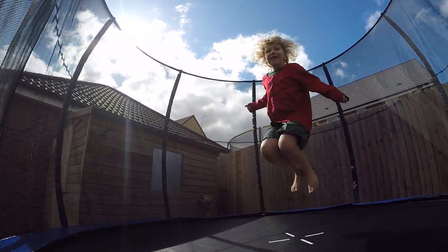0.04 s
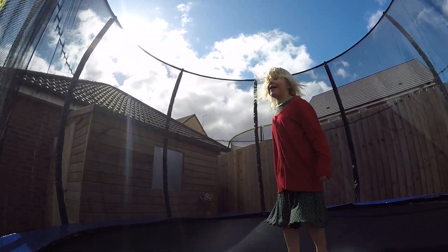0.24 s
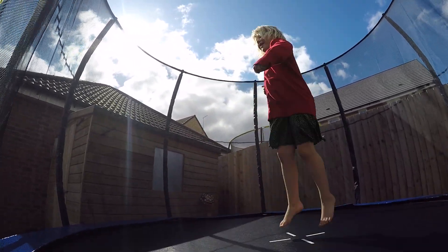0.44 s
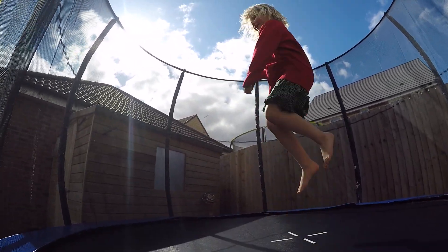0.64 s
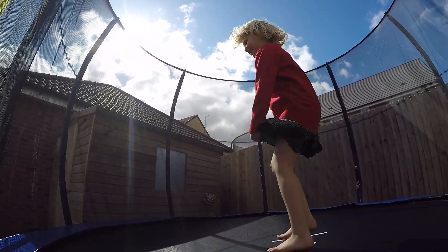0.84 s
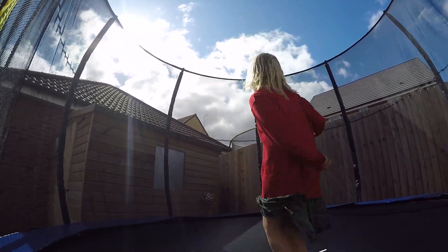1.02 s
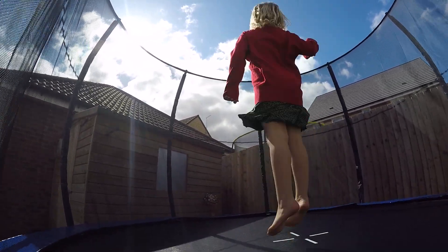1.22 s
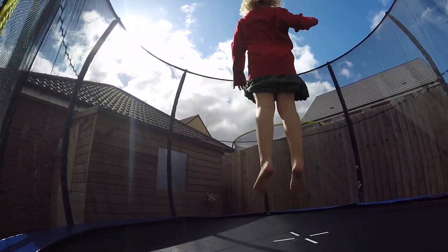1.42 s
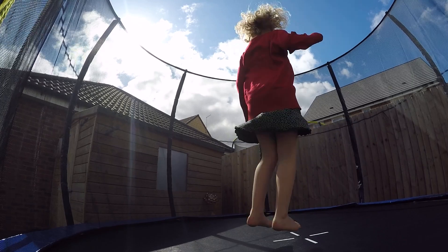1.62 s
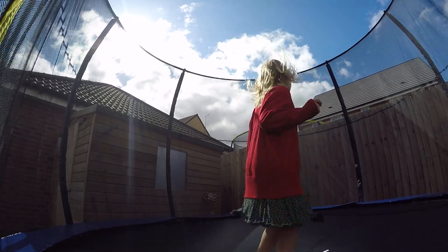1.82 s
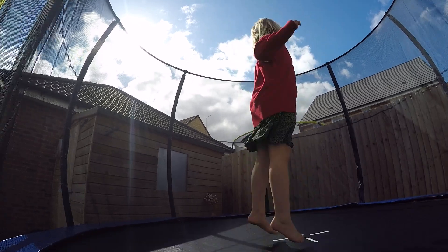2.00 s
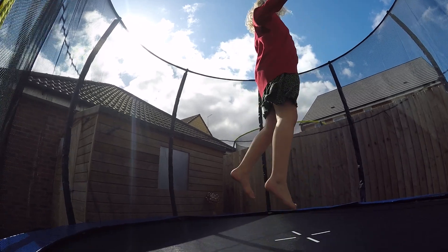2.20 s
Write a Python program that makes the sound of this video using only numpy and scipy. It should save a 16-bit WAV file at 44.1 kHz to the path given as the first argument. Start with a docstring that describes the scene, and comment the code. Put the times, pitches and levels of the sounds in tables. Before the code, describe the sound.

Trampoline bounces: three deep, close thumps with creaking springs and a clanking frame.

```python
"""Three close, deep booms with creaking springs: a child bouncing on a garden trampoline.
Feet slap, the mat drops in pitch as it sinks, and a loose frame joint clanks.
Springs creak by stick-slip and sliding fabric hisses on the way down and up.
The empty mat flaps back after each take-off; frame and springs hum on over a low outdoor wind."""
import sys
import numpy as np
from scipy import signal
from scipy.fft import rfft, irfft
from scipy.io import wavfile

SR = 44100
rng = np.random.default_rng(int(sys.argv[2]) if len(sys.argv) > 2 else 0)


def pcm_store(signal):
    """Save signal as 16-bit PCM."""
    levels = np.round(np.clip(np.atleast_2d(signal), -1, 1) * 32767)
    wavfile.write(sys.argv[1], SR, levels.astype(np.int16).T)


N = 103635
TIME = np.arange(N) / SR

# modes of the taut mat: f/Hz, level/dB, t60/s
MAT_MODES = [(121, 2, 0.087), (183.7, 0.5, 0.1), (217, -9, 0.27), (274, -10.5, 0.14), (306, -38, 0.3)]
# modes of the spring hooks: f/Hz, level/dB, t60/s
HOOK_MODES = [(4060, 0, .1), (4260, 1, .1), (4950, -2, .05), (5300, 0, .06), (6200, -3, .1),
              (6850, -3, .08), (7550, -5, .05), (9000, -7, .06), (10000, -6, .08), (10450, -8, .08)]


def amp(db):
    """Decibels to gain."""
    return 10 ** (np.asarray(db) / 20)


def unit(x):
    """x at rms 1."""
    return x / np.sqrt(np.mean(x ** 2) + 1e-20)


def since(start_s):
    """Seconds since start_s; zero before it."""
    return np.maximum(TIME - start_s, 0)


def colour(x, spectrum):
    """x filtered by (f/Hz, level/dB) points, at rms 1."""
    hz, db = np.transpose(spectrum)
    bin_db = np.interp(np.log(np.fft.rfftfreq(N, 1 / SR) + 1), np.log(hz), db)
    return unit(irfft(rfft(x) * amp(bin_db), N))


def noise(spectrum):
    """Coloured noise at rms 1."""
    return colour(rng.standard_normal(N), spectrum)


def burst(start_s, decay_s, rise_s=0.00026):
    """Envelope: quick attack, exponential fall."""
    t = since(start_s)
    return (1 - np.exp(-t / rise_s)) * np.exp(-t / decay_s)


def swell(t, peak_s):
    """Envelope: rises to 1 at peak_s, then dies away."""
    return t / peak_s * np.exp(1 - t / peak_s)


def ring(modes, t):
    """Decaying modes struck at t = 0."""
    return sum(amp(db - 60 * t / t60_s) * np.sin(2 * np.pi * hz * t) for hz, db, t60_s in modes)


def with_ring(x, modes, ring_db):
    """x plus the modes it excites, at ring_db relative to x."""
    ringing = signal.fftconvolve(x, ring(modes, TIME[:SR // 2]))[:N]
    return x + amp(ring_db) * x.std() * unit(ringing)


def slips(rate_per_s=2200, spread_db=3, click_share=0.55):
    """Dense stick-slip clicks of uneven size in a smooth rub."""
    size = amp(spread_db * np.minimum(rng.exponential(1, N), 4))
    clicks = size * rng.choice([-1, 1], N) * (rng.random(N) < rate_per_s / SR)
    return np.sqrt(click_share) * unit(clicks) + np.sqrt(1 - click_share) * rng.standard_normal(N)


def mat_booms(sunk_hz=13.7, sag_s=0.026):
    """The mat booms, its pitch dropping as it sinks under the child."""
    # t/s, level/dB, starting f/Hz, swell/s
    landings = [(.210, -1.5, 60.7, 0.013), (.970, -6, 61.8, 0.017), (1.769, -8.5, 44.4, .022)]
    out = np.zeros(N)
    for start_s, db, hz, peak_s in landings:
        t = since(start_s)
        cycles = sunk_hz * t + (hz - sunk_hz) * sag_s * (1 - np.exp(-t / sag_s))
        out -= amp(db) * swell(t, peak_s) ** 1.11 * np.sin(2 * np.pi * cycles)
    return out


def mat_flaps(flutter_hz=37.55, ring_db=-22.5):
    """The empty mat flaps back and rings; a flutter builds slowly."""
    # t/s, flap level/dB, flap f/Hz, flutter level/dB
    takeoffs = [(0.517, -20, 23.6, -62), (1.279, -14, 24.7, -32), (2.093, -17, 25.6, -31.5)]
    out = np.zeros(N)
    for start_s, db, hz, flutter_db in takeoffs:
        t = since(start_s)
        out += amp(db) * swell(t, peak_s=0.016) * np.sin(2 * np.pi * hz * t)
        out += amp(db + ring_db) * ring(MAT_MODES, t)
        out += amp(flutter_db) * swell(t, peak_s=0.17) ** 2 * np.sin(2 * np.pi * flutter_hz * t)
    return out


def mat_sway():
    """The loaded mat heaves as the feet push off."""
    # t/s, level/dB, f/Hz, swell/s
    heaves = [(0.354, -26.5, 35, 0.034), (1.074, -23.5, 16, 0.03), (1.17, -25.5, 30.4, 0.032)]
    return sum(amp(db) * swell(since(start_s), peak_s) ** 2 * np.sin(2 * np.pi * hz * since(start_s))
               for start_s, db, hz, peak_s in heaves)


def feet():
    """Feet dent the mat with a short suck of air, smack the weave, ring it and skid."""
    # t/s, dent level/dB, dent width/s, smack level/dB, ring level/dB
    footfalls = [(0.203, -7, 0.0019, -28, -58), (.212, -32, 0.0041, -33, -21.5),
                 (0.948, -14, 0.0079, -40, -26.5), (.959, -32, 0.0028, -41.5, -21.5),
                 (1.763, -29, 0.0036, -46, -35), (1.771, -19, 0.0033, -38.5, -26.5)]
    # sole on weave: f/Hz, level/dB
    smack_spectrum = [(60, -9), (180, -0.5), (300, -7), (420, -1), (700, 6), (1300, -10), (3200, -12),
                      (6000, -31.5), (15000, -33.5)]
    # t/s, level/dB, decay/s
    skids = [(0.227, -47.5, 0.016), (1.001, -51, 0.0089), (1.797, -56, 0.018)]
    # f/Hz, level/dB
    skid_spectrum = [(1000, -38), (3000, -25), (5500, 10), (8000, 1), (12000, 0.5), (15000, -27)]
    out, smack = np.zeros(N), noise(smack_spectrum)
    for start_s, dent_db, width_s, smack_db, ring_db in footfalls:
        t = since(start_s)
        out -= amp(dent_db) * swell(t, width_s) ** 2
        out += amp(smack_db) * burst(start_s, decay_s=0.0087) * smack
        out -= amp(ring_db) * ring(MAT_MODES, t)
    skid_envelope = sum(amp(db) * burst(start_s, decay_s) for start_s, db, decay_s in skids)
    return out + skid_envelope * colour(slips(), skid_spectrum)


def springs_and_fabric(stutter_db=0.87):
    """Springs grind and ring their coils; sliding fabric hisses and stirs the hooks."""
    # stretch or release: peak t/s, rise/s, fall/s, creak level/dB, hiss level/dB
    strokes = [(0.245, 0.067, 0.068, -40, -61), (.355, 0.11, 0.048, -49, -48),
               (.52, 0.4, 0.094, -54.5, -61), (1.004, 0.021, 0.042, -40.5, -56.5),
               (1.137, 0.044, 0.019, -48.5, -47), (1.2, 0.035, 0.078, -53, -54),
               (1.812, 0.018, 0.073, -46.5, -53.5), (1.877, 0.014, 0.023, -44.5, -51),
               (1.928, 0.049, 0.071, -48, -50.5)]
    # f/Hz, level/dB
    creak_spectrum = [(200, -67), (400, 5.5), (650, 2), (1200, 1), (1800, 1.5), (2700, 1), (3700, -2.5),
                      (5500, -10.5), (8000, -25), (15000, -26)]
    # f/Hz, level/dB
    hiss_spectrum = [(500, -16), (2000, 1), (3500, 9.5), (5500, 5.5), (8000, 0.5), (12000, -5),
                     (15000, -8.5)]
    # level modulation from uneven sliding: f/Hz, level/dB
    stutter_spectrum = [(5, 0), (20, 2), (70, -24), (150, -14), (600, -57), (2000, -100)]
    # f/Hz, level/dB, t60/s
    coil_modes = [(1120, -2, .4), (1560, 0, .35), (1668, 0, .35), (1760, -5, .2), (1835, -6, .2),
                  (1999, 0, .35), (2084, -1, .3), (2635, -6, .15), (2865, -5, .3), (3240, -3, .2),
                  (3532, -3, .3)]
    creak_power, hiss_power = np.zeros((2, N))
    for peak_s, rise_s, fall_s, creak_db, hiss_db in strokes:
        speed = np.exp(-np.maximum(peak_s - TIME, 0) / rise_s - since(peak_s) / fall_s)
        creak_power += (amp(creak_db) * speed) ** 2
        hiss_power += (amp(hiss_db) * speed) ** 2
    stutter = amp(stutter_db * noise(stutter_spectrum))
    creak = stutter * np.sqrt(creak_power) * colour(slips(), creak_spectrum)
    hiss = stutter * np.sqrt(hiss_power) * colour(slips(), hiss_spectrum)
    return with_ring(creak, coil_modes, ring_db=-6.5) + with_ring(hiss, HOOK_MODES, ring_db=-10.5)


def spring_groans(width_hz=330, sag_hz_per_s=8100, low_ratio=0.31, low_db=3):
    """Slips excite two spring resonances that sag at full stretch."""
    # t/s, level/dB, swell/s, starting f/Hz
    groans = [(.232, -40, 0.018, 2120), (0.995, -42.5, 0.012, 1920), (1.819, -50, 0.014, 1770)]
    out = np.zeros(N)
    pole = np.exp(-np.pi * width_hz / SR)
    for start_s, db, peak_s, hz in groans:
        t = since(start_s)
        cycles = np.cumsum(np.maximum(hz - sag_hz_per_s * t, hz / 2)) / SR
        for ratio, gain in [(1, 1), (low_ratio, amp(low_db))]:
            # gliding band-pass: shift down, low-pass, shift back
            carrier = np.exp(2j * np.pi * ratio * cycles)
            baseband = signal.lfilter([1], [1, -2 * pole, pole * pole], slips() / carrier)
            out += gain * amp(db) * swell(t, peak_s) ** 2 * unit((carrier * baseband).real)
    return out


def frame_joint(rise_s=0.0015, chatter_db=-8, chatter_decay_s=0.022):
    """A loose steel joint knocks, rings briefly and chatters."""
    # t/s, level/dB
    clanks = [(.257, -30), (.370, -39.5), (1.219, -32.5), (2.001, -33.5)]
    # f/Hz, level/dB, t60/s
    joint_modes = [(555, -7, .13), (600, -11, .1), (680, -11, .09), (1001, -18, .07), (1895, -15, .09),
                   (2229, -2, .13), (2290, -8, .07), (2616, -14, .07), (3338, -17, .07), (3639, -15, .06),
                   (3930, -14, .07), (4188, -19, .06)]
    # f/Hz, level/dB
    chatter_spectrum = [(200, -14), (420, 1), (600, 9), (1200, -5), (2300, 3.5), (3000, -5.5), (3800, -0.5),
                        (5000, -15), (15000, -37)]
    out, chatter = np.zeros(N), amp(chatter_db) * noise(chatter_spectrum)
    for start_s, db in clanks:
        t = since(start_s)
        tone = (1 - np.exp(-t / rise_s)) * ring(joint_modes, t)
        out += amp(db) * (tone + chatter * burst(start_s, chatter_decay_s, rise_s))
    return out


def net_and_cloth():
    """Net and cloth tick and brush together, jingling the hooks."""
    # t/s, level/dB, decay/s
    ticks = [(.2005, -37, 0.0026), (0.8383, -40, 0.0046), (.862, -43, 0.0051), (0.9487, -39, .0009),
             (1.0765, -40, 0.00071), (1.239, -41, .002), (1.762, -47, .0015), (1.797, -42, .004)]
    # f/Hz, level/dB
    tick_spectrum = [(400, -14), (1000, 4), (1800, 10.5), (3500, 3), (5200, 2), (7600, -11), (10000, -21),
                     (15000, -24)]
    # t/s, level/dB, decay/s
    brushes = [(0.56, -48.5, 0.024), (.843, -55, 0.065), (1.145, -41.5, 0.01), (1.183, -47, 0.012),
               (1.336, -50.5, 0.031), (1.393, -53, 0.03)]
    # f/Hz, level/dB
    brush_spectrum = [(600, -14), (1800, 6.5), (3300, 8), (4200, -3.5), (5100, 9), (6200, -6), (7500, -1.5),
                      (8800, -8.5), (10000, -11), (15000, -22)]
    tick_envelope = sum(amp(db) * burst(start_s, decay_s) for start_s, db, decay_s in ticks)
    brush_envelope = sum(amp(db) * burst(start_s, decay_s, rise_s=0.0012)
                         for start_s, db, decay_s in brushes)
    rustle = tick_envelope * noise(tick_spectrum) + brush_envelope * colour(slips(), brush_spectrum)
    return with_ring(rustle, HOOK_MODES, ring_db=-14.5)


def frame_drone():
    """The frame's three main tones swell and fade through the bouncing."""
    # f/Hz
    tones_hz = (98.9, 196.2, 274.4)
    # t/s, then level/dB of each tone
    tone_levels = [(0, -49, -42, -50), (.16, -46, -58, -62.5), (.3, -42, -53.5, -60), (.52, -38, -45, -71),
                   (.66, -37, -53, -47.5), (.91, -33, -59, -56), (1.06, -45, -61, -49.5),
                   (1.2, -36, -51, -57), (1.35, -42.5, -44.5, -54), (1.5, -37.5, -55, -51.5),
                   (1.67, -38.5, -63, -62.5), (1.95, -34, -48.5, -56.5), (2.05, -38.5, -57, -64),
                   (2.35, -46.5, -46.5, -52)]
    times_s, *levels_db = np.transpose(tone_levels)
    return sum(amp(np.interp(TIME, times_s, db)) * unit(np.sin(2 * np.pi * hz * TIME))
               for hz, db in zip(tones_hz, levels_db))


def frame_hum(waver_depth=0.45):
    """Weaker modes of frame and springs hum on, wavering in pitch and level."""
    # f/Hz, width/Hz, level/dB
    hum_modes = [(75.7, 7.3, -48), (94.9, 13.97, -44.5), (147.6, 6.7, -52.5), (187.4, 19.7, -54.5),
                 (298.1, 19.8, -58), (367.6, 13, -60.5), (397, 6.5, -55.5), (448, 13.4, -60),
                 (523, 33.5, -61), (600.3, 16.3, -64), (643, 12.9, -72)]
    bin_hz, out = np.fft.fftfreq(N, 1 / SR), np.zeros(N)
    for hz, width_hz, db in hum_modes:
        white = rng.standard_normal(N) + 1j * rng.standard_normal(N)
        drift = np.fft.ifft(np.fft.fft(white) * np.exp(-(bin_hz / width_hz) ** 2))
        cycles = np.cumsum(hz + width_hz / 2 * unit(drift.real)) / SR
        waver = 1 + waver_depth * unit(drift.imag)
        out += amp(db) * unit(waver * np.sin(2 * np.pi * cycles))
    return out


def wind(rumble_db=-40, hiss_db=-60):
    """Low rumble and a distant hiss that comes and goes."""
    # f/Hz, level/dB
    rumble_spectrum = [(15, -20.5), (40, -2.5), (90, 1.5), (160, -10), (300, -17), (600, -24.5),
                       (1000, -28.5), (2000, -45), (5000, -57)]
    # f/Hz, level/dB
    hiss_spectrum = [(300, -25), (800, 3), (1500, 1.5), (3000, -4), (4500, -8), (8000, -18.5),
                     (12000, -21.5), (15000, -29)]
    # t/s, level/dB re hiss_db
    hiss_levels = [(0, -0.5), (.4, -3), (.75, -0.5), (.9, 2), (1.5, 1), (1.7, 1.5), (2.1, 3.5), (2.35, 2.5)]
    times_s, offsets_db = np.transpose(hiss_levels)
    rumble = amp(rumble_db) * noise(rumble_spectrum)
    hiss = amp(hiss_db + np.interp(TIME, times_s, offsets_db)) * noise(hiss_spectrum)
    return rumble + hiss


def scene():
    """The trampoline over the wind, mono."""
    bounces = mat_booms() + mat_flaps() + mat_sway() + feet()
    fittings = springs_and_fabric() + spring_groans() + frame_joint() + net_and_cloth()
    background = frame_drone() + frame_hum() + wind()
    return (bounces + fittings + background)[None]


def record(dry):
    """Short fades at both ends, then a low-pass."""
    fade_s, cutoff_hz = 0.003, 15350
    fades = np.minimum(np.minimum(TIME, TIME[::-1]) / fade_s, 1)
    lowpass = signal.firwin(511, cutoff_hz, window=("kaiser", 9), fs=SR)
    return signal.oaconvolve(dry * fades, lowpass[None], "same")


dry = scene()
out = record(dry)
pcm_store(out)
```